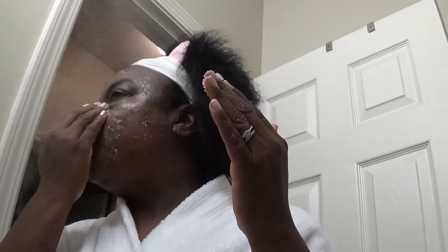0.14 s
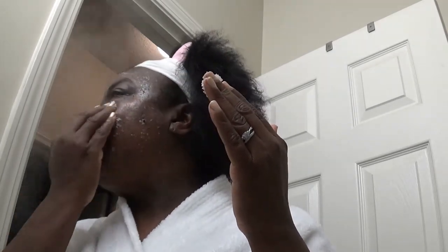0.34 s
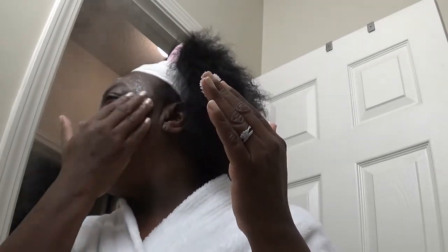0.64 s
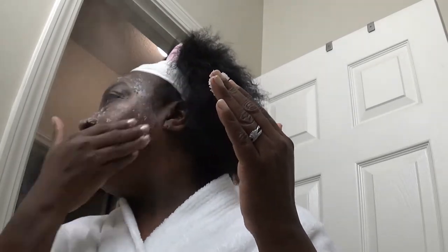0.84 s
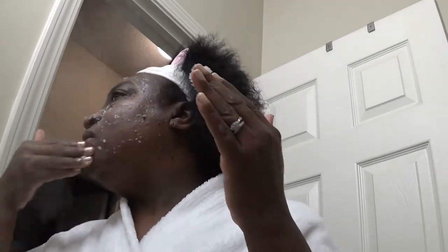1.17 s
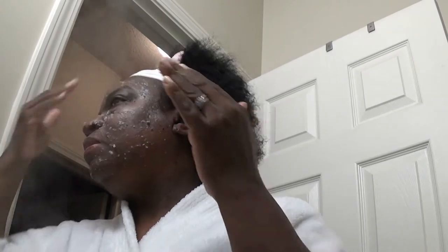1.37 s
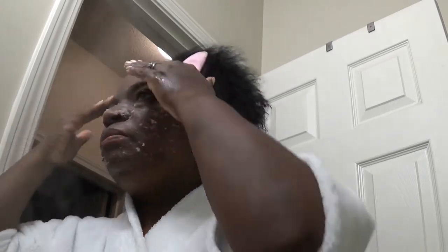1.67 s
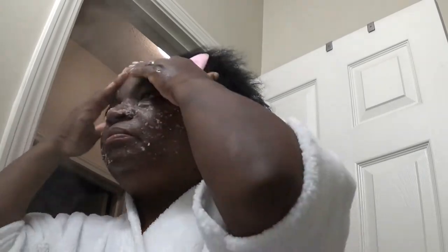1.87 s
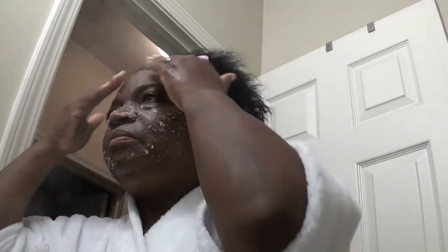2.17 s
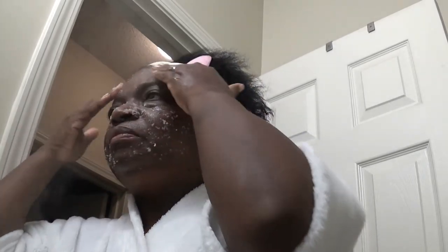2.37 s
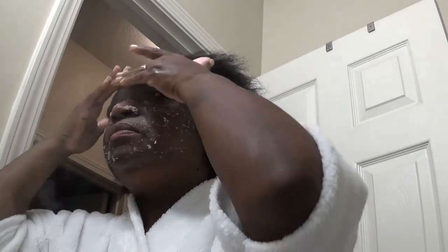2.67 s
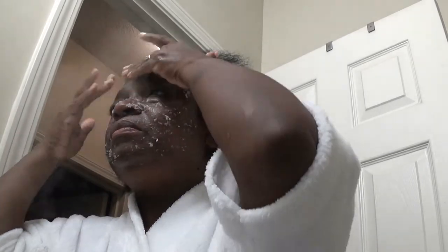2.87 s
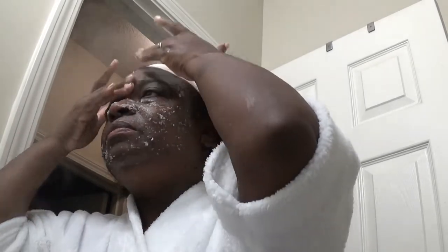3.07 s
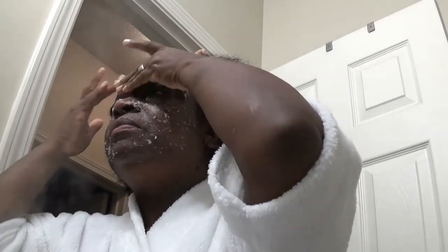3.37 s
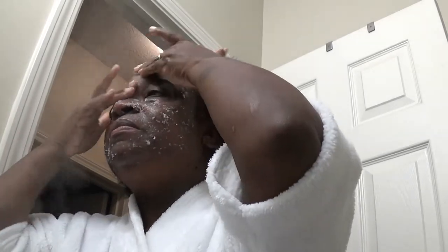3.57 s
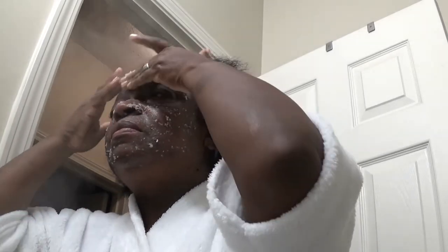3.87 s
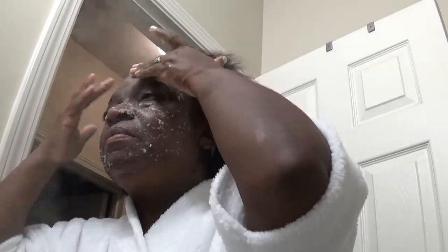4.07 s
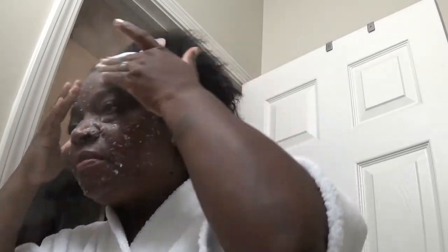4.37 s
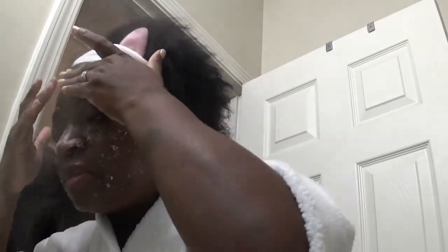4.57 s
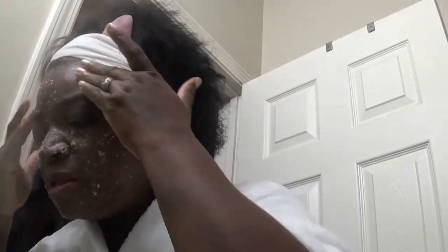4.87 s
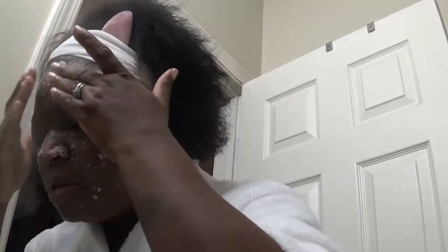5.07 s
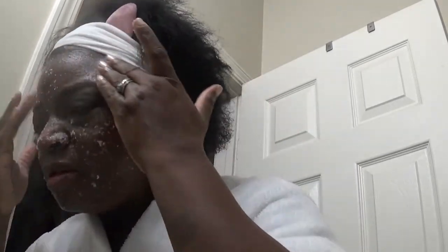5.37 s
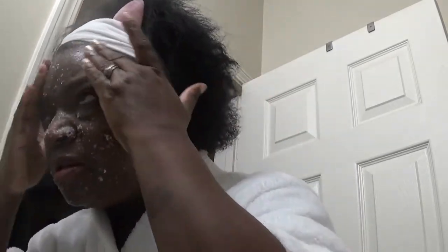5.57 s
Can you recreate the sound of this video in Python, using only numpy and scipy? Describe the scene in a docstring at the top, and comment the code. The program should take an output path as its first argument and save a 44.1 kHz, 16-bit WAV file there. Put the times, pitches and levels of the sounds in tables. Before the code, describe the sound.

A facial steamer hisses steadily and brightly in a small bathroom, with tiny wet spits, a faint low boiling rumble and a few soft knocks.

```python
"""A steady, flickering hiss: the jet of a facial steamer in a small hard-walled bathroom, as noise and ringing drops.
Single big drops spit and three soft knocks fall, as decaying cosines; a faint resonated-noise hum wavers.
Below lie a lumpy rumble of boiling water and air, coloured by resonances,
and very low, slowly varying noise with four quieter stretches.
Hiss and rumble dip together four times; the deepest dip is sudden and creeps back.
Two close ports receive it all as sum plus and minus difference."""
import sys
import numpy as np
from scipy import signal
from scipy.fft import rfft, irfft, next_fast_len
from scipy.io import wavfile

SR = 44100
rng = np.random.default_rng(int(sys.argv[2]) if len(sys.argv) > 2 else 0)


def unload_audio(sound):
    """Save the sound as a 16-bit wav file, at the path given as the first command line argument."""
    columns = np.transpose(np.atleast_2d(sound))
    # keep every value between -1 and 1, then stretch to whole-number steps
    steps = np.round(np.clip(columns, -1, 1) * 32767)
    wavfile.write(sys.argv[1], SR, steps.astype(np.int16))


N = 252693
SIZE = next_fast_len(N)
T_S = np.arange(N) / SR
GRID_HZ = np.maximum(np.fft.rfftfreq(SIZE, 1 / SR), 1)

# Jet spectrum before resonances: (frequency [Hz], relative density [dB per Hz])
JET_COLOUR = [(350, -55), (600, -14.5), (928, -12.5), (1020, -10), (1220, -12.5), (1400, -5), (1890, -7.5),
              (2050, -9.5), (2440, -8), (3440, -7), (3940, -6.5), (5610, -7.5), (8920, 0), (11600, -4.5),
              (15600, -15.5)]
# Dips of hiss and rumble: (start [s], depth [dB], time to sink [s], time to return [s])
DIPS = [(0.0, 1.2, 0.017, 0.29), (1.38, 3, 0.014, 1.74), (3.8, 0.6, 0.95, .04), (5.17, 1, 0.025, 0.077)]
# Big drops: (start [s], level before high-pass [dB], pitch [Hz])
SPITS = [(1.71, -10, 3800), (1.737, -13, 3690), (1.7724, -14, 3640), (1.7924, -22, 3950),
         (2.9402, -12, 3980), (3.8594, -19, 4380), (3.8994, -15, 4410), (4.9796, -14, 4000),
         (5.036, -10, 3870), (5.0434, -13, 3910)]
# Soft knocks, first mode: (start [s], level before high-pass [dB], pitch [Hz])
KNOCKS = [(.073, -16.5, 241), (1.96, -18.5, 306), (4.0713, -12.5, 294)]
# Hum level: (time [s], rms level [dB])
HUM_LEVEL = [(0.0, -47), (0.59, -47), (1.64, -59), (3.03, -40.5), (4.1, -51.5), (5.14, -44.5), (5.73, -62)]
# Rumble spectrum before resonances: (frequency [Hz], relative density [dB per Hz])
RUMBLE_COLOUR = [(32, -43), (55, -21.5), (129, 0), (226, 0.5), (261, -3), (353, -1), (457, -10.5),
                 (496, -6.5), (538, -8.5), (900, -11.5), (1170, -54), (1980, -120)]
# Lowest noise, spectrum before resonances: (frequency [Hz], relative density [dB per Hz])
LOWEST_COLOUR = [(10, -6), (32, 10), (55, -3), (90, -44)]
# Quieter stretches of the lowest noise: (start [s], length [s])
QUIET_STRETCHES = [(.1, .3), (1.06, 0.6), (3.92, 0.28), (4.55, 0.49)]
# Resonances and dips of room and steamer housing: (centre [Hz], width [Hz], height [dB])
RESONANCES = [(68.7, 11, 12), (122, 36, 3.5), (186, 13, -0.5), (273, 10, -10), (298, 26, 5.5),
              (353, 30, 0.5), (395, 14, -8), (425.5, 19, 7), (497, 8.7, 8), (707, 16, 4), (825, 20, 4.5),
              (1003, 26, 6), (1035, 12, 4), (1187, 125, -1.5), (1398, 34, 3.5), (1410, 25, -0.5),
              (1998, 40, 3.5), (2095, 72, 7), (2730, 81, -0.5), (3350, 410, -2), (3920, 120, 3),
              (4850, 30, 0.5), (6160, 34, 4.5), (6300, 32, 0), (6700, 49, -0.5), (8800, 450, 2.5),
              (9900, 270, 3)]
# Port difference against sum: (frequency [Hz], level [dB])
WIDTH = [(100, -56), (250, -40), (560, -43), (900, -8.5), (1040, -6.5), (1200, -7.5), (1600, -5),
         (2100, -7), (3400, -6.5), (5200, -1), (7500, -4), (10000, -9.5), (11500, -10.5), (12300, -24),
         (12700, -70)]
# Share of the difference that follows the sum:
# (frequency [Hz], in step = leaning left [ratio], quarter cycle apart = one port late [ratio])
COUPLING = [(700, 0.25, -0.036), (1040, 0.49, .1), (2300, 0.31, .1), (3900, 0.46, 0), (4800, 0.35, -.05),
            (5200, 0.38, .3), (6200, 0.36, .3), (6600, 0.11, .2), (8200, 0.18, .4), (9300, -0.12, .35),
            (11400, -0.1, .3)]

JET_DB, RUMBLE_RE_JET_DB = -14.5, -17.5
SPIT_T60_S, KNOCK_T60_S = 0.013, 0.026
UPPER_PITCH_RATIO, UPPER_RE_FIRST_DB = 2.33, -10.5
HUM_HZ, HUM_STAGE_T60_S = 360.4, 0.32
LOWEST_DB, QUIET_DB, QUIET_EDGE_S = -53.5, -13, 0.06
ROOM_T60_S, ROOM_RE_DIRECT_DB = 0.09, -15
CUTOFF_HZ = 15745


def jet():
    """Turbulent hiss: overlapping bands of noise and drops, flickering partly together."""
    drop_power_share = 0.22
    eddies = rng.standard_normal((2, N))
    drops = droplets(per_s=6000, spread_db=3.0, cycles=34.0)
    mix = np.sqrt(1 - drop_power_share) * eddies + np.sqrt(drop_power_share) * drops
    spectrum = rfft(mix, SIZE)
    together_db = 0.36 * drift(5.8) + 0.32 * drift(50.0)
    third_octaves = 3 * np.log2(GRID_HZ / 500)
    hiss = 0
    for k in range(16):
        band = np.cos(np.pi / 2 * np.clip(third_octaves - k, -1, 1)) ** 2
        own_db = 0.74 * drift(10.0) + 0.79 * drift(55.0)
        hiss = hiss + irfft(spectrum * band, SIZE)[:, :N] * from_db(together_db + own_db)
    return from_db(loudness_db()) * coloured(room(hiss), JET_COLOUR)


def droplets(per_s, spread_db, cycles):
    """Bursting drops of chance strength and pitch; T60 spans a fixed cycle count; rms 1."""
    strength_db = spread_db * np.minimum(rng.exponential(1, (2, N)), 4)
    bursts = from_db(strength_db) * (rng.random((2, N)) < per_s / SR)
    pitches_hz = np.geomspace(700, 15000, 48)
    dealt = rng.integers(0, 48, (2, N))
    # weight by pitch: evens out the spectrum
    return rms_one(sum(hz * ring(bursts * (dealt == k), hz, cycles / hz)
                       for k, hz in enumerate(pitches_hz)))


def loudness_db():
    """Steady hiss level minus dips, straight lines in dB."""
    dips_db = sum(np.interp(T_S - s, [0, down_s, down_s + back_s], [0, depth_db, 0])
                  for s, depth_db, down_s, back_s in DIPS)
    return JET_DB - dips_db


def spits():
    """Each big drop is one fast-dying mode."""
    return struck_modes(SPITS, SPIT_T60_S)


def knocks():
    """Each soft knock is two modes, dying equally fast."""
    upper = [(s, level_db + UPPER_RE_FIRST_DB, hz * UPPER_PITCH_RATIO) for s, level_db, hz in KNOCKS]
    return struck_modes(KNOCKS + upper, KNOCK_T60_S)


def struck_modes(events, t60_s):
    """Sharp-starting, exponentially decaying cosines, without deep bass."""
    out = np.zeros(N)
    for start_s, level_db, hz in events:
        t = T_S - start_s
        decay = from_db(level_db - 60 * np.maximum(t, 0) / t60_s)
        out += (t >= 0) * decay * np.cos(2 * np.pi * hz * t - 0.6)
    return signal.sosfilt(signal.butter(2, 140, "high", fs=SR, output="sos"), out)


def hum():
    """Noise through one narrow resonance, twice: a broken, unsteady tone."""
    level_db = np.interp(T_S, *np.transpose(HUM_LEVEL))
    once = ring(rng.standard_normal(N), HUM_HZ, HUM_STAGE_T60_S)
    tone = ring(once, HUM_HZ, HUM_STAGE_T60_S)
    return from_db(level_db) * rms_one(tone)


def rumble():
    """Boiling water and air: lumpy low noise whose level follows the jet's dips."""
    lumps = rng.standard_normal((2, N)) * from_db(2.25 * drift(8.2))
    return from_db(loudness_db() + RUMBLE_RE_JET_DB) * coloured(lumps, RUMBLE_COLOUR)


def lowest_noise():
    """Very low, slowly varying noise with four quieter stretches."""
    quiet = sum(np.clip(np.minimum(T_S - s, s + length_s - T_S) / QUIET_EDGE_S, 0, 1)
                for s, length_s in QUIET_STRETCHES)
    noise = rng.standard_normal((2, N)) * from_db(2.8 * drift(4.0))
    return from_db(LOWEST_DB + QUIET_DB * quiet) * coloured(noise, LOWEST_COLOUR)


def room(x):
    """Direct sound plus a dying cloud of reflections, which ripples the spectrum finely."""
    t = np.arange(SR // 2) / SR
    cloud = rng.standard_normal(len(t)) * from_db(-60 * t / ROOM_T60_S) * (t > 0.002)
    cloud = cloud / np.sqrt(np.sum(cloud ** 2))
    return filtered(x, 1 + from_db(ROOM_RE_DIRECT_DB) * rfft(cloud, SIZE))


def coloured(x, colour):
    """Shape by a smooth colour plus the resonances; rms 1."""
    resonances_db = sum(db / (1 + (2 * (GRID_HZ - hz) / width_hz) ** 2)
                        for hz, width_hz, db in RESONANCES)
    return rms_one(filtered(x, from_db(at_hz(colour) + resonances_db)))


def ports(direct, diffuse):
    """Left and right = sum plus and minus difference; difference is part sum, part diffuse."""
    coupling = at_hz(COUPLING, column=1) - 1j * at_hz(COUPLING, column=2)
    free = np.sqrt(np.clip(1 - np.abs(coupling) ** 2, 0, 1))
    width = from_db(at_hz(WIDTH))
    side = filtered(direct, width * coupling) + filtered(diffuse, width * free)
    return np.array([direct + side, direct - side])


def drift(pole_hz):
    """Slow chance, spread 1: noise at every 20th sample through two equal one-pole low-passes."""
    r = np.exp(-2 * np.pi * pole_hz * 20 / SR)
    noise = rng.standard_normal(N // 20 + 4002)
    slow = signal.lfilter([1], [1, -2 * r, r * r], noise)[4000:]   # drop the settling
    return np.interp(np.arange(N) / 20, np.arange(len(slow)), rms_one(slow))


def ring(clicks, hz, t60_s):
    """Two-pole resonance: a unit click starts a decaying sine of height 1."""
    r, w = from_db(-60 / (t60_s * SR)), 2 * np.pi * hz / SR
    return signal.lfilter([0, np.sin(w)], [1, -2 * r * np.cos(w), r * r], clicks + 1e-18)


def filtered(x, response):
    """Multiply the spectrum by a frequency response."""
    return irfft(rfft(x, SIZE) * response, SIZE)[..., :N]


def at_hz(points, column=1):
    """Table column on the frequency grid, interpolated over log frequency."""
    rows = np.array(points)
    return np.interp(np.log(GRID_HZ), np.log(rows[:, 0]), rows[:, column])


def from_db(db):
    """Amplitude gain of a level in dB."""
    return 10 ** (np.asarray(db) / 20)


def rms_one(x):
    """Scale to rms 1."""
    return x / np.sqrt(np.mean(x ** 2) + 1e-20)


def scene():
    """Steamer and room as the two ports receive them."""
    direct, diffuse = jet() + rumble() + lowest_noise()
    return ports(direct + hum() + knocks() + spits(), diffuse)


def record(dry):
    """Soft saturation towards a ceiling, then a steep low-pass."""
    ceiling = 4.1
    rounded = ceiling * np.tanh(dry / ceiling)
    return signal.sosfilt(signal.ellip(14, 0.3, 75, CUTOFF_HZ, fs=SR, output="sos"), rounded)


dry = scene()
out = record(dry)
unload_audio(out)
```